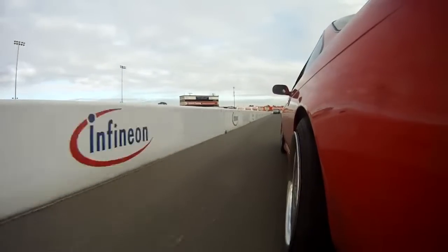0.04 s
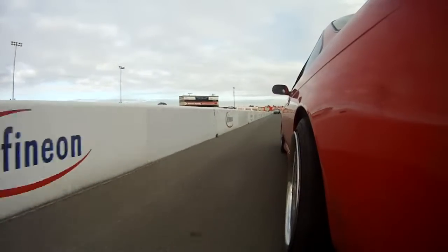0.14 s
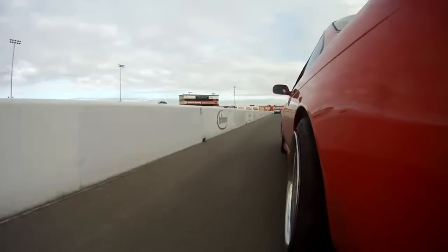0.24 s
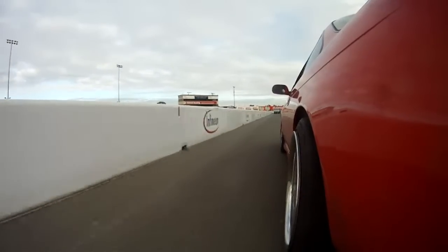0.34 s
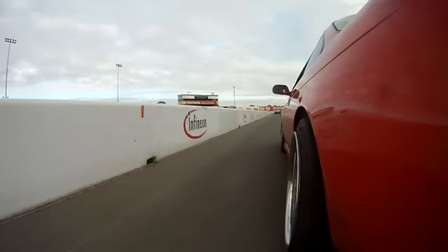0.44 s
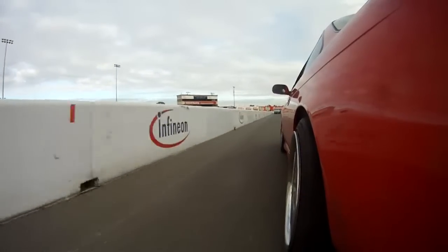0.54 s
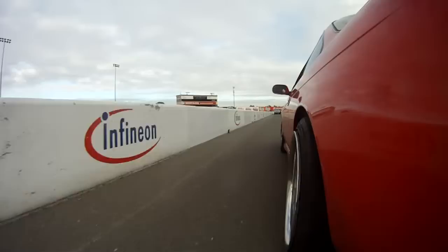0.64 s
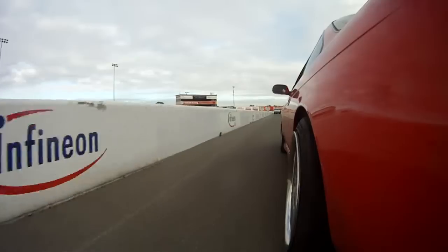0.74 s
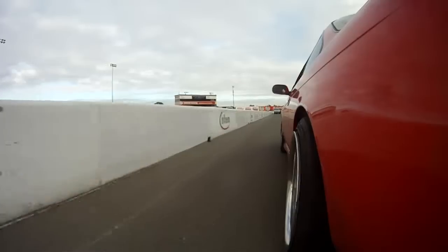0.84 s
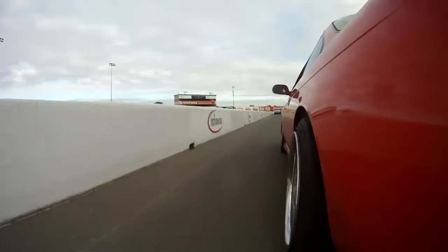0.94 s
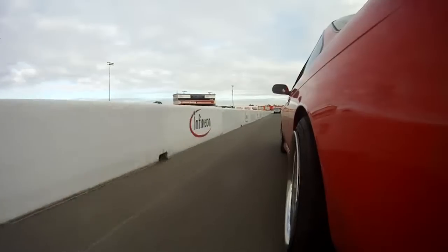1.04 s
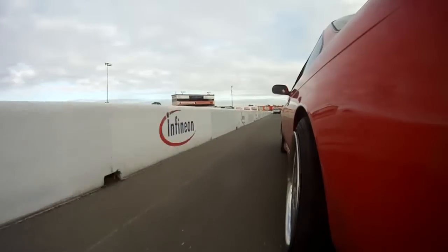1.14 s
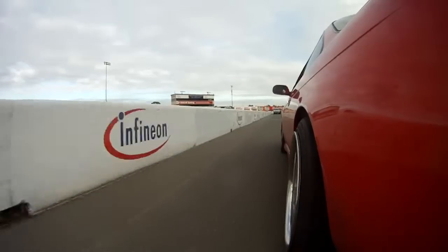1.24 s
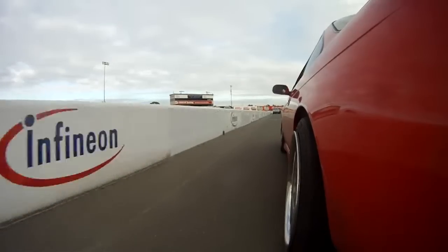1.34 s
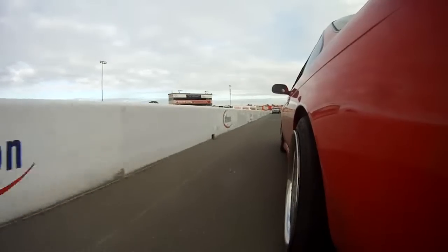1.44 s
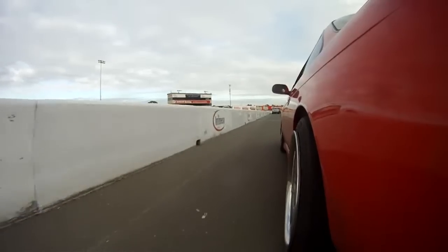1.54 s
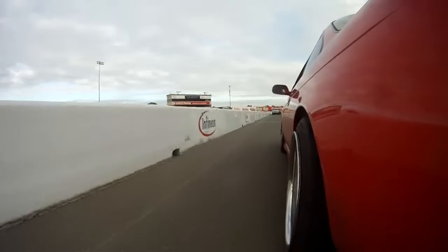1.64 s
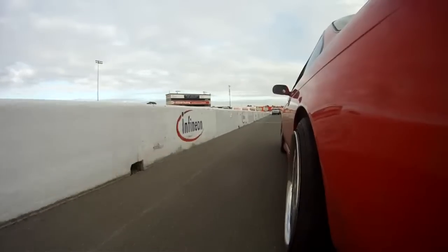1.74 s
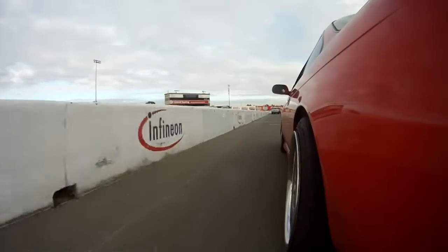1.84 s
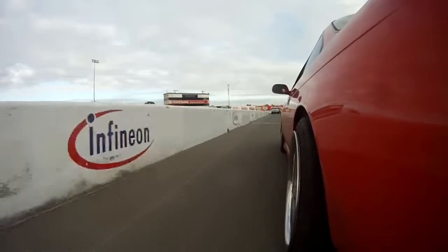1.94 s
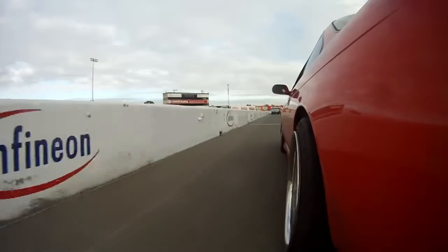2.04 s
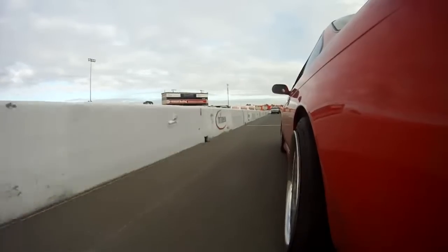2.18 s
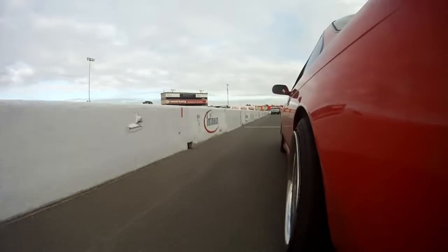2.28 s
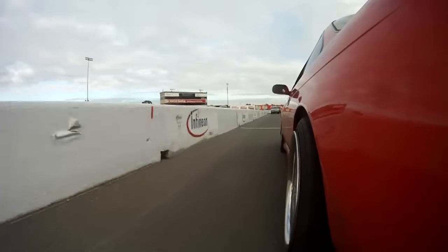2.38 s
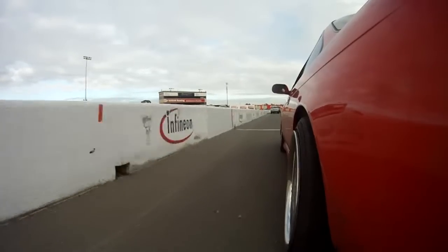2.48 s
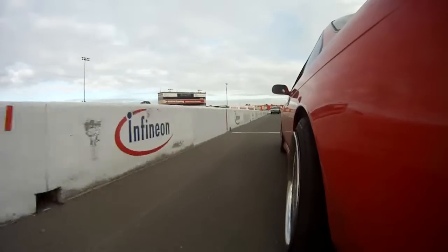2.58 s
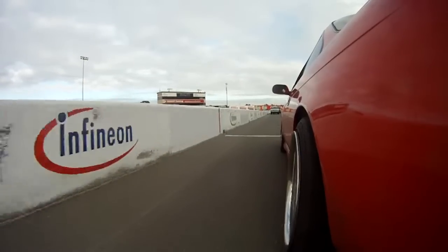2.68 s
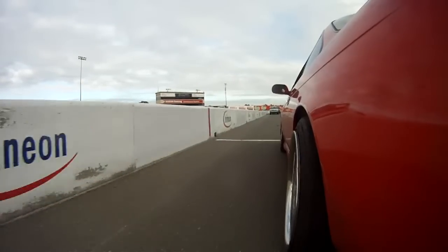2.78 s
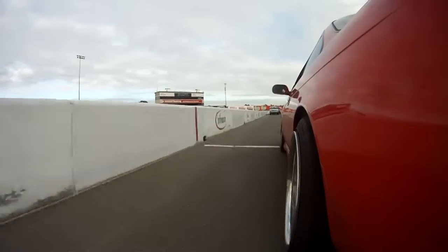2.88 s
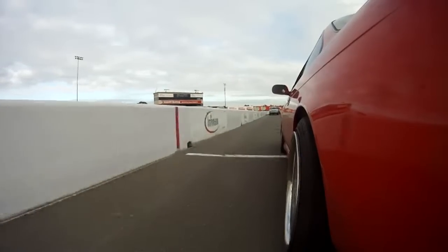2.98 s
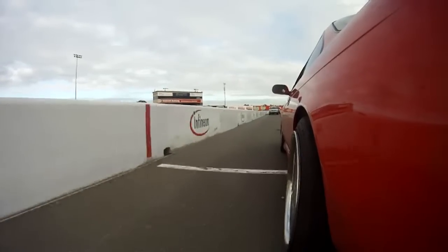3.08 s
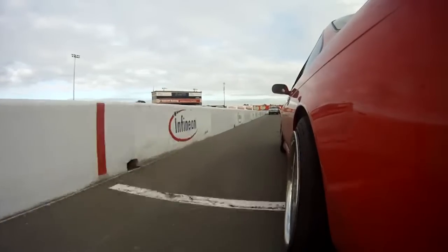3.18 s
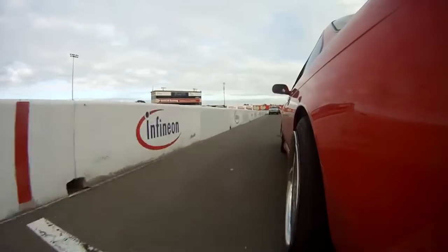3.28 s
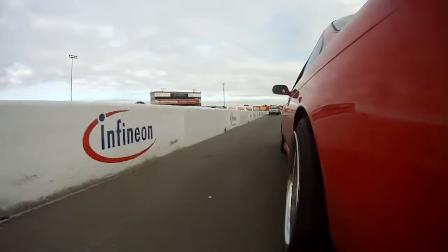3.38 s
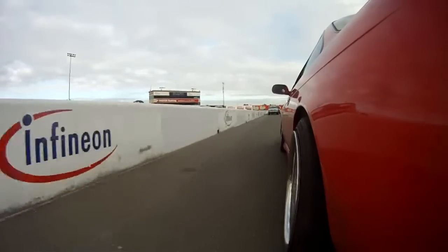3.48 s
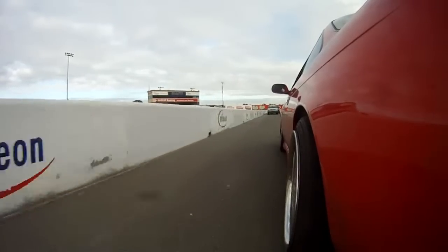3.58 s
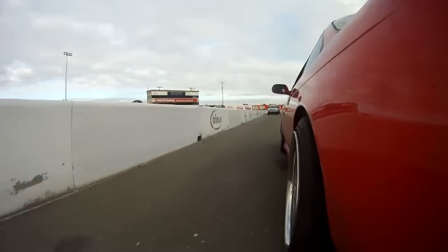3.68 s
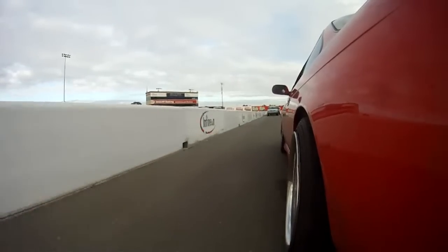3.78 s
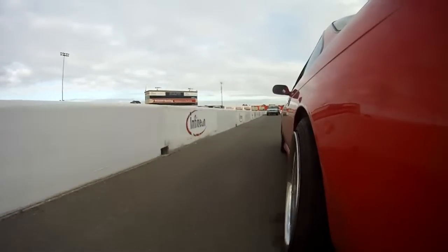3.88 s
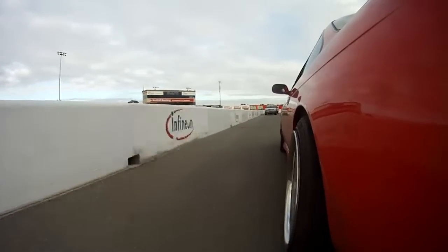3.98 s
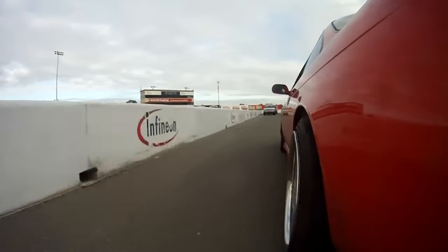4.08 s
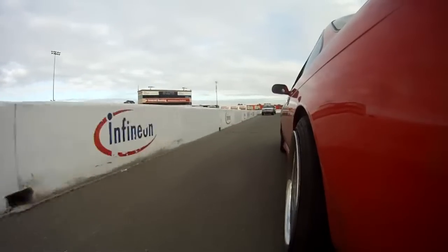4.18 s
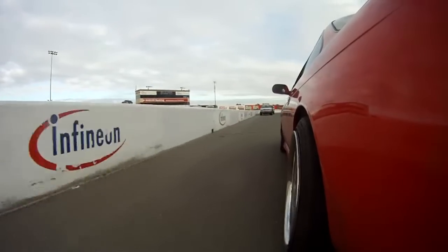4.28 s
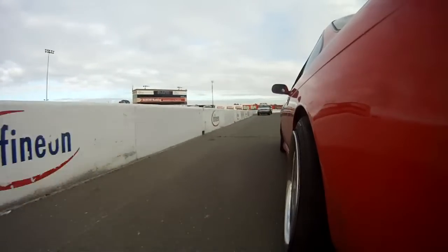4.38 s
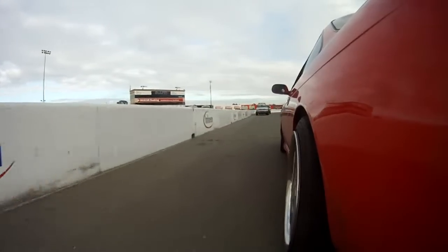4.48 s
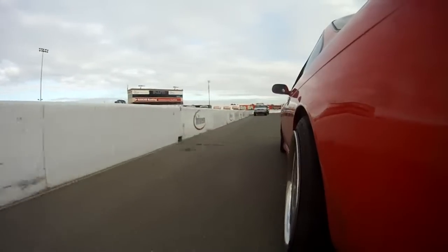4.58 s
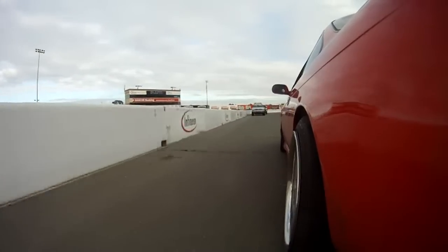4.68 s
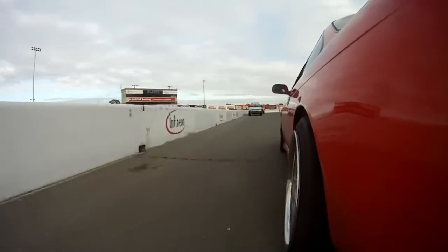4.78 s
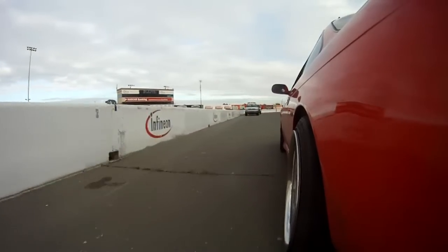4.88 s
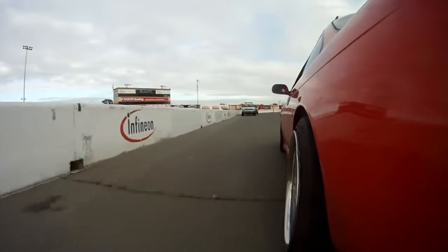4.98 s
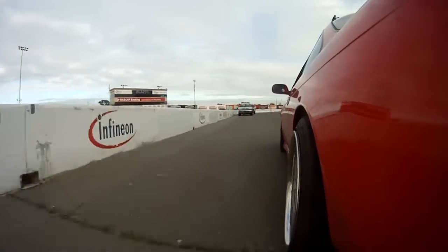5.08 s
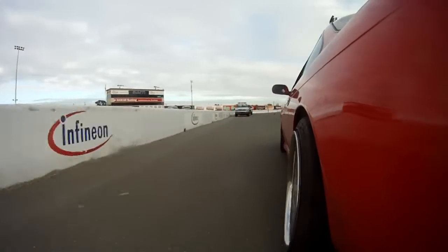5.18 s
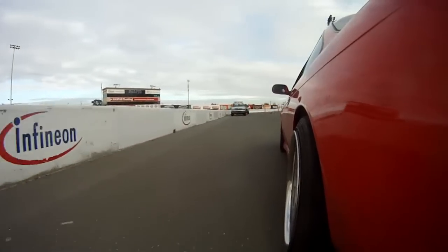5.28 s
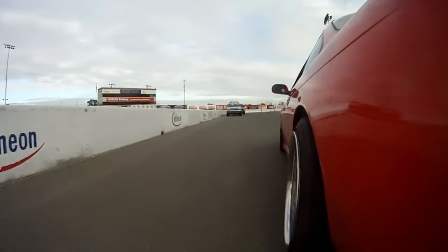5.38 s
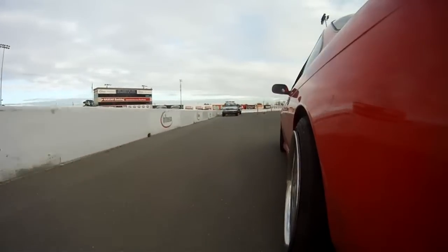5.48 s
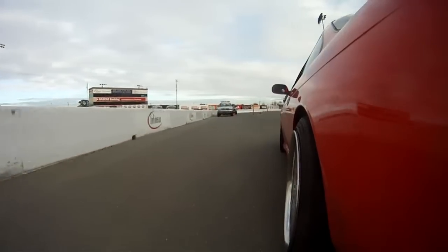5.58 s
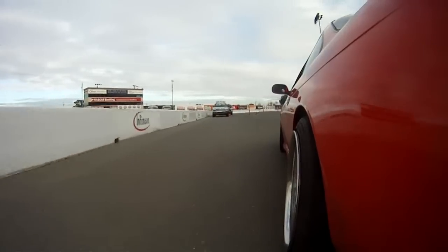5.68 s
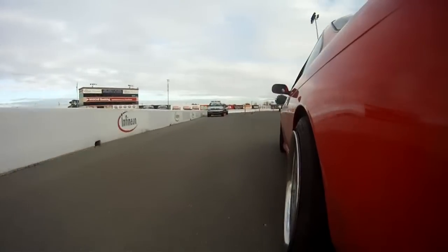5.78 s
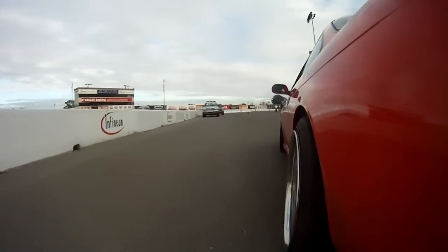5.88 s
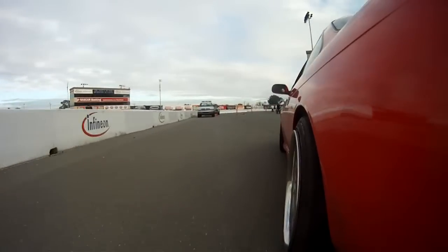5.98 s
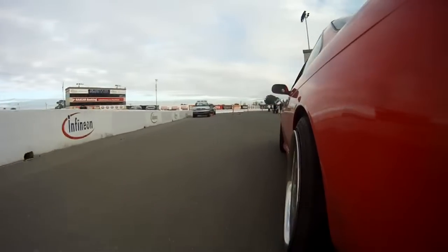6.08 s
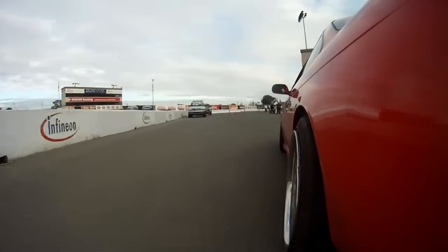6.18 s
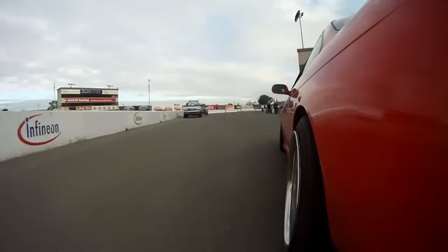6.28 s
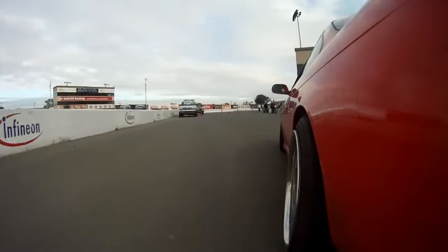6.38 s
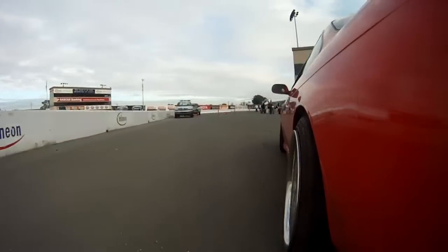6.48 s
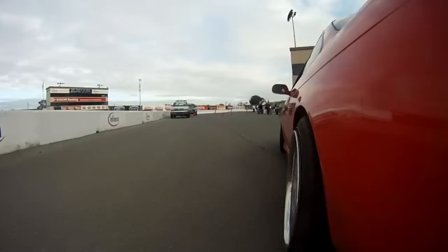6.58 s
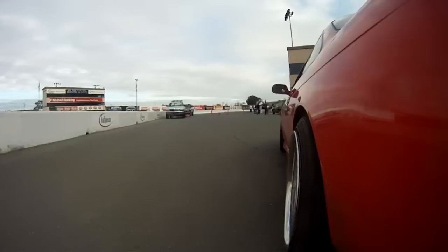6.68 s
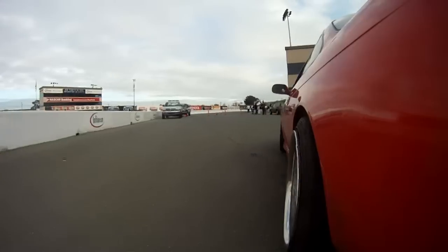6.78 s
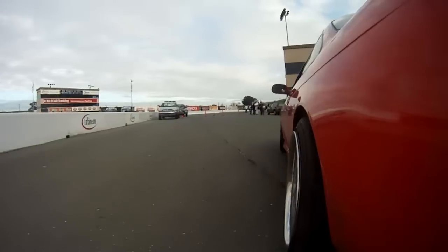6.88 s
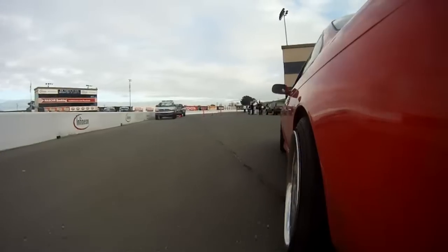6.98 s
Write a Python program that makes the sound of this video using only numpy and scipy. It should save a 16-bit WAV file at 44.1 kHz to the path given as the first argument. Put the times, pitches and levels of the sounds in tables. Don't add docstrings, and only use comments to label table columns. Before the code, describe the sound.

Hollow car exhaust drone over shaking rumble and hissing tyres slides down and drops to a lumpy, quieter idle while coasting along a pit lane.

```python
import sys
import numpy as np
from scipy import signal
from scipy.fft import rfft, irfft
from scipy.io import wavfile
from scipy.ndimage import uniform_filter1d

SR = 44100
rng = np.random.default_rng(int(sys.argv[2]) if len(sys.argv) > 2 else 0)


def generate_wav(signal):
    frames = np.transpose(np.atleast_2d(signal))
    scaled = np.clip(frames, -1, 1) * 32767
    pcm = np.round(scaled).astype(np.int16)
    wavfile.write(sys.argv[1], SR, pcm)


def invert_db(level):
    return 10 ** (np.asarray(level, dtype=float) / 20)


N = 310023
T = np.arange(N) / SR
HZ = np.fft.rfftfreq(N, 1 / SR) + 1e-3
WHEEL_HZ, SLOWING_HZ_PER_S = 15.7, 1.04
IDLE_S, IDLE_FADE_S = 1.9, .025


def rms_one(x):
    return x / np.sqrt(np.mean(x ** 2) + 1e-20)


def in_time(rows):
    s, *columns = np.transpose(rows)
    return [np.interp(T, s, c) for c in columns]


def at_hz(points, hz):
    f, level = np.transpose(points)
    return np.interp(np.log(hz), np.log(f), level, left=-90, right=-90)


def boost_db(peaks, hz):
    return sum(db / (1 + (2 * (hz - centre_hz) / width_hz) ** 2) for centre_hz, width_hz, db in peaks)


def drift(rate):
    r = np.exp(-80 * np.pi * rate / SR)
    slow = signal.lfilter([1], [1, -2 * r, r * r], rng.standard_normal(N // 40 + 2002))[2000:]
    return np.interp(np.arange(N) / 40, np.arange(len(slow)), rms_one(slow))


def coloured(x, gain_db):
    return rms_one(irfft(rfft(x) * invert_db(gain_db), N))


def speed_db(power):
    return power * 20 * np.log10(1 - SLOWING_HZ_PER_S * T / WHEEL_HZ)


def idling():
    return 1 / (1 + np.exp((IDLE_S - T) / IDLE_FADE_S))


# [t/s, f/Hz, level/dB]
ENGINE = [(0, 55.5, -22.5), (.8, 53.67, -21.5), (1.2, 52.75, -21), (1.36, 47.82, -20.5),
          (1.55, 41.1, -25.5), (1.86, 28.97, -22.5), (1.98, 27.22, -42), (2.15, 29.06, -37.5),
          (2.45, 31.61, -34.5), (2.9, 34.3, -32), (3.3, 34.38, -34.5), (4.0, 32.71, -33), (4.6, 31.88, -33),
          (4.9, 30.51, -35.5), (5.8, 29.1, -35.5), (6.25, 29.88, -33), (6.6, 30.92, -34),
          (7.03, 31.62, -32.5)]
# [multiple of that rate, overrun level/dB, idle level/dB]
ORDERS = [(1, -30, -11.5), (2, -2.5, -18.5), (3, -8, -8), (4, -14, -7.5), (5, -15, -7), (6, -24, -13.5),
          (7, -23.5, -14), (8, -27, -31), (9, -38, -28)]
# [f/Hz, width f/Hz, boost level/dB]
PIPE = [(123.8, 21, 4), (238, 24, -6), (269, 10, 3)]
# [f/Hz, width f/Hz, boost level/dB]
PANEL = [(210, 16, 5)]
# [f/Hz, level/dB per Hz]
RASP = [(280, -30), (360, 0), (500, 0.5), (700, 1.5), (900, -2), (1300, -26)]
# [f/Hz, width f/Hz, boost level/dB]
HOUSING = [(418, 27, 7), (712, 40, 6), (1168, 70, 6), (1334, 50, 5), (2150, 70, 7.5), (2355, 70, 3),
           (2700, 50, 2), (2980, 60, 3), (3113, 100, 5), (3280, 40, 6), (3528, 45, 6), (3660, 60, 4),
           (3930, 45, 5), (4120, 50, 3)]


def exhaust():
    hz, level_db = in_time(ENGINE)
    idle = idling()
    turn = 2 * np.pi * np.cumsum(hz) / SR + .05 * drift(5)
    lumpy_db = (.3 + 1.0 * idle) * np.tanh(drift(18))
    smear = np.interp(hz, [37, 52], [.05, 1.3])
    sag_db, sag_below_hz, idle_db = 4, 52, 6
    panel_extra_db = sag_db * np.clip((sag_below_hz - hz) / 4, 0, 1) + idle_db * idle
    tones = np.zeros(N)
    for k, order_overrun_db, order_idle_db in ORDERS:
        k = round(k)
        order_hz = k * hz
        panel_db = boost_db(PANEL, order_hz) * (1 + panel_extra_db / PANEL[0][2])
        db = boost_db(PIPE, order_hz) + panel_db + lumpy_db
        db += (.7 * k - .6) * (1 - .78 * idle) * np.tanh(drift(7))
        phase = k * turn + .045 * k * drift(4)
        share = invert_db(order_overrun_db) * (1 - idle) + invert_db(order_idle_db) * idle
        muffled = 1 / np.sqrt(1 + (order_hz / 286) ** 16)
        muffled /= np.sqrt(1 + (82 / order_hz) ** 12 * (1 - idle))
        tones -= np.sqrt(2) * invert_db(db) * muffled * share * np.cos(phase - smear * (k - 3) ** 2)
    puffs = rng.standard_normal(N) * (1 + 0.82 * np.cos(2 * turn))
    rasp = coloured(puffs, at_hz(RASP, HZ) + boost_db(HOUSING, HZ))
    rasp_fade = np.clip((hz - 36) / 16, 0, 1)
    return invert_db(level_db) * (tones + invert_db(-27.5) * rasp_fade * rasp)


# [multiple of wheel turns, level/dB]
WHEEL_ORDERS = [(2, -8), (3, 1), (4, 1.5), (5, -19), (6, -4)]
# [t/s, level/dB]
JOLTS = [(.03, -24), (.31, -29), (.40, -28), (.81, -27), (1.3, -28), (1.46, -28), (1.86, -32), (1.99, -30),
         (2.09, -28.5), (2.19, -27.5), (2.3, -26), (2.43, -34), (2.54, -27), (2.88, -24.5), (3.04, -20.5),
         (3.29, -20.5), (3.52, -27.5), (3.82, -21.5), (4.09, -22.5), (4.31, -23.5), (4.59, -25),
         (4.69, -28.5), (5.01, -27.5), (5.15, -25), (5.26, -26.5), (5.95, -29), (6.06, -27.5), (6.19, -30),
         (6.57, -30), (6.85, -30.5)]


def mount_shake():
    jolt_s, bend_s, bend_length_s = 0.05, 5.85, .5
    turns = WHEEL_HZ - SLOWING_HZ_PER_S * T
    sway_hz = 49.64 - 1.5 * T + 8 * np.exp(-((T - bend_s) / bend_length_s) ** 2)
    power = invert_db(-30.5 + speed_db(0.9) + 3 * drift(12.5)) ** 2
    power += sum(invert_db(db) ** 2 * np.exp(-((T - s) / jolt_s) ** 2) for s, db in JOLTS)
    angle = 2 * np.pi * np.cumsum(turns) / SR
    lines = np.zeros(N)
    for k, db in WHEEL_ORDERS:
        k = round(k)
        lift = 0.076 + 1 / np.sqrt(1 + ((k * turns - sway_hz) / 7) ** 2)
        lines += invert_db(db + 2.5 * drift(1)) * lift * np.sin(k * angle + .6 * drift(1))
    sway = np.sin(2 * np.pi * np.cumsum(sway_hz) / SR + .9 * drift(3))
    jolts = coloured(rng.standard_normal(N), -14 * np.log2(HZ / 44) ** 2)
    shake = invert_db(-2) * rms_one(lines) + rms_one(sway) + invert_db(-6) * jolts
    even = np.sqrt(uniform_filter1d(shake ** 2, size=2200) + 0.18)
    return np.sqrt(power) * shake / even


# [t/s, level/dB]
ROAD = [(0, 0.5), (1, -0.5), (1.7, 0.5), (2.1, -0.5), (3.4, -0.5), (4, -1), (4.4, 0.5), (5.2, 0),
        (6.2, 0.5), (7.03, -2.5)]
# [f/Hz, level/dB per Hz]
BOOM = [(6, -31), (10, -3.5), (20, 1), (43, -3.5), (87, -13), (150, -8.5), (210, -3), (280, -13),
        (320, -22.5), (400, -34.5), (600, -31.5), (800, -71)]
# [f/Hz, width f/Hz, boost level/dB]
HOP = [(13, 2, 13)]
# [f/Hz, level/dB per Hz]
ROAR = [(250, -19), (350, -6.5), (500, -14.5), (660, -15), (800, -10.5), (980, -4), (1160, -6),
        (1260, -10.5), (1420, -12.5), (1530, -7), (1720, -16), (1900, -13), (2300, -17.5)]
# [f/Hz, level/dB per Hz]
HISS = [(1000, -22), (1700, -27), (1890, -32), (2030, -0.5), (2130, -2.5), (2580, -5.5), (2820, -14),
        (3170, -11.5), (4000, -13), (4510, -21.5), (5120, -14), (6000, -31.5), (7800, -69), (13200, -120)]


def contact(grains_per_s, grain_db):
    hits = rng.random(N) < grains_per_s / SR
    sizes = invert_db(6.1 * np.minimum(rng.exponential(1, N), 4))
    grains = hits * sizes * rng.choice([-1, 1], N)
    return rng.standard_normal(N) + invert_db(grain_db) * rms_one(grains)


def tyres():
    coarse_db, = in_time(ROAD)
    boom_db = -33.5 + speed_db(0.073) + 2.5 * (1 - idling())
    roar_db = -41.5 + speed_db(1.92) + 0.97 * coarse_db
    hiss_db = -40.5 + speed_db(2.2) + 0.84 * coarse_db
    together = 0.9 * drift(10.7) + 0.99 * drift(30)
    housing = boost_db(HOUSING, HZ)
    body = .5 * (boost_db(PANEL, HZ) + boost_db(PIPE, HZ))
    rumble = rng.standard_normal(N) * invert_db(2.0 * np.tanh(drift(3.5)))
    boom = coloured(rumble, at_hz(BOOM, HZ) + boost_db(HOP, HZ) + body + housing)
    roar = coloured(contact(150, -13.5), at_hz(ROAR, HZ) + housing)
    hiss = coloured(contact(300, -14.0), at_hz(HISS, HZ) + housing)
    out = invert_db(boom_db) * boom
    out += invert_db(roar_db + 0.56 * together + 0.98 * drift(4.7)) * roar
    out += invert_db(hiss_db + .5 + 0.61 * together + 0.12 * drift(15)) * hiss
    return out


# [t/s, peak level/dB, length t/s, centre f/Hz, spread/octaves]
GRIT = [(0.008, -37, 0.013, 930, 1.8), (0.173, -26.5, .008, 2160, 0.44), (0.415, -32, 0.0053, 2180, 0.37),
        (1.628, -27.5, 0.0028, 2270, 0.31), (1.849, -19, 0.00077, 2300, 0.24),
        (1.849, -29, 0.00067, 1097, 0.5), (2.503, -43, 0.0036, 2163, .5), (3.30, -37.5, 0.031, 900, 0.53),
        (3.37, -36, 0.019, 1004, 0.29), (4.282, -27, 0.026, 952, 0.97), (4.306, -31.5, 0.026, 1390, 1.1),
        (4.35, -36, 0.013, 2120, 0.15), (5.229, -41, 0.011, 1002, 0.44), (5.809, -40, 0.0044, 2000, 0.55),
        (6.492, -39, 0.0083, 3797, 0.94), (6.494, -30, .013, 1990, 1.18), (6.496, -34, .01, 1180, 0.11),
        (6.498, -37, .009, 1550, .2), (6.515, -40, .008, 2100, 0.23), (6.502, -44, 0.0072, 2500, .3)]


def grit():
    out, size = np.zeros(N), 4096
    t, hz = np.arange(size) / SR, np.fft.rfftfreq(size, 1 / SR) + 1
    tread_db = 0.99 * (at_hz(HISS, np.maximum(hz, 2130)) - 16 * np.exp(-((hz - 1750) / 220) ** 2))
    forward = np.r_[1, 2 * np.ones(size // 2 - 1), 1, np.zeros(size // 2 - 1)]
    for s, peak_db, length, centre_hz, spread in GRIT:
        burst = rng.standard_normal(size) * (t / length) ** 1.07 * np.exp(-2.5 * t / length)
        colour = -6 * (np.log2(hz / centre_hz) / spread) ** 2 + 1.44 * boost_db(HOUSING, hz) + tread_db
        fold = irfft(np.log(invert_db(np.maximum(colour - colour.max(), -50)))) * forward
        burst = irfft(rfft(burst) * np.exp(rfft(fold)), size)
        at = round(s * SR)
        out[at:at + size] += invert_db(peak_db) * burst / np.abs(burst).max()
    return out


# [t/s, f/Hz, level/dB]
FAR_CAR = [(2.6, 407, -56), (2.95, 416.8, -55.5), (3.4, 421, -59.5), (4.1, 425, -58), (5.0, 436.7, -54.5),
           (5.4, 441.2, -58), (5.95, 410.4, -55), (6.45, 438.6, -57.5), (7.03, 455, -63)]
# [multiple of a quarter of that pitch, level/dB]
FAR_ORDERS = [(3, -5), (4, -1), (5, -8), (6, -11)]


def car_ahead():
    hz, level_db = in_time(FAR_CAR)
    turn = 2 * np.pi * np.cumsum(hz + 2.2 * drift(6)) / SR / 4
    fade = np.clip((T - FAR_CAR[0][0]) / 0.36, 0, 1)
    tones = sum(invert_db(level_db + db + 1.8 * drift(2.5)) * np.sin(round(k) * turn) for k, db in FAR_ORDERS)
    return np.sqrt(2) * fade * tones


# [t/s, peak level/dB, f/Hz, rise t/s, fall by 60 dB t/s]
BUMPS = [
    (3.362, -9.5, 212, 0.016, 0.16),
    (4.065, -26.5, 285, 0.0042, 0.13),
    (3.5, -41, 345, 0.0049, 0.078),
    (3.86, -32, 322, 0.0049, .07),
    (3, -34, 330, 0.005, 0.072),
    (4.276, -26.5, 297, 0.0042, 0.16),
    (4.277, -31, 335, 0.0041, 0.12),
    (4.1, -41, 470, 0.0063, 0.078),
]


def bumps():
    out, t = np.zeros(N), T[:SR // 2]
    for s, peak_db, hz, rise, t60 in BUMPS:
        swell = 1 - np.exp(-(t / rise) ** 2)
        ring = invert_db(peak_db - 60 * t / t60) * swell * np.sin(2 * np.pi * hz * t)
        out[round(s * SR):][:len(t)] += ring
    return out


def scene():
    return (exhaust() + mount_shake() + tyres() + grit() + car_ahead() + bumps())[None]


def low_pass(x):
    return signal.sosfilt(signal.butter(12, 15540, fs=SR, output="sos"), x)


def record(dry):
    low = signal.resample_poly(dry, 40, 147, axis=1, padtype="line")
    held = np.repeat(low, 4, axis=1)
    out = signal.resample_poly(held, 147, 160, axis=1, padtype="line")[:, :N]
    hz = np.fft.rfftfreq(2 * N, 1 / SR)
    gain = (hz < 15310) * hz ** 2 / (hz ** 2 + 8 ** 2)
    mirrored = np.hstack([out, out[:, ::-1]])
    out = irfft(rfft(mirrored) * gain)[:, :N]
    return low_pass(out)


dry = scene()
out = record(dry)
generate_wav(out)
```